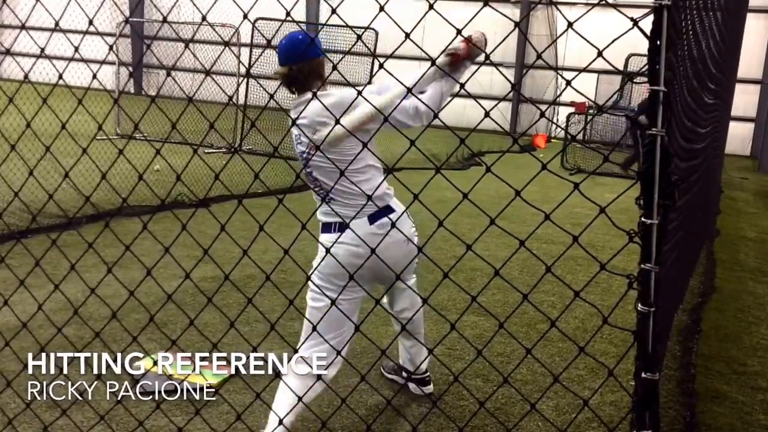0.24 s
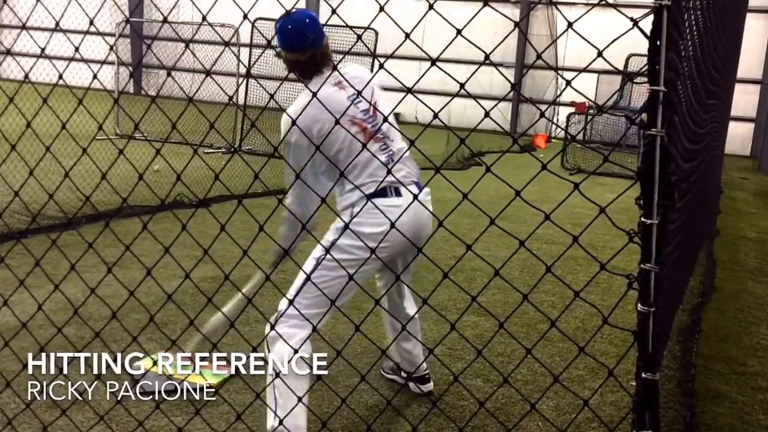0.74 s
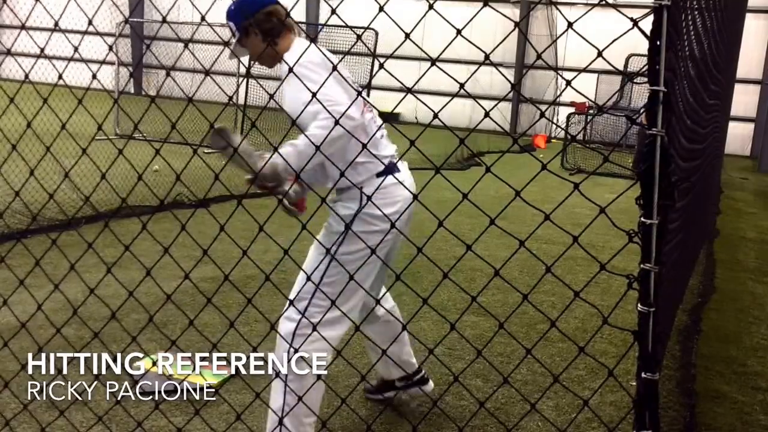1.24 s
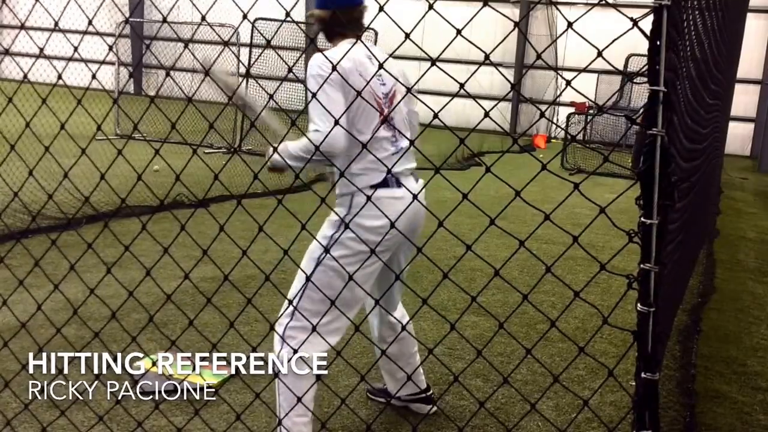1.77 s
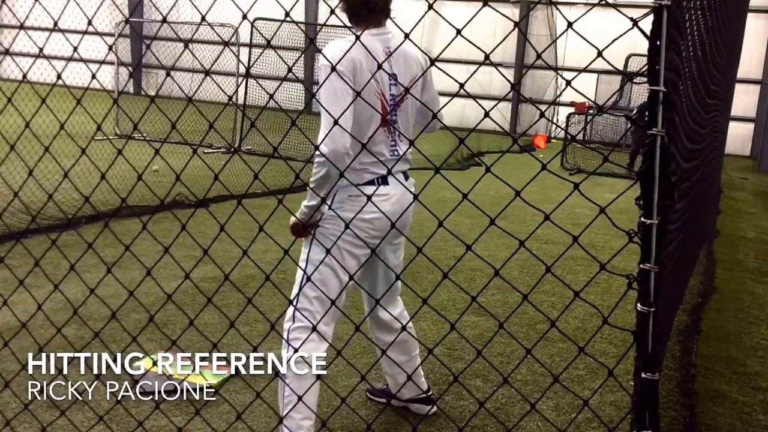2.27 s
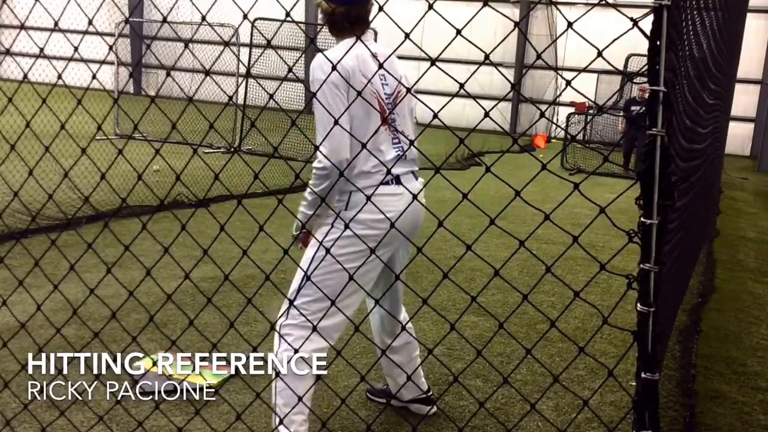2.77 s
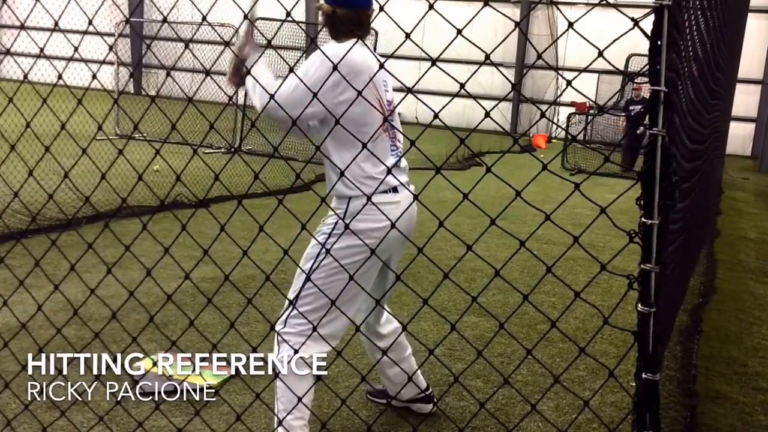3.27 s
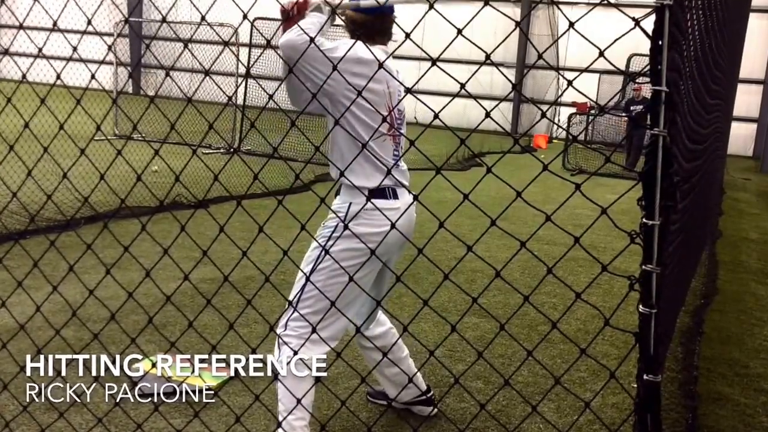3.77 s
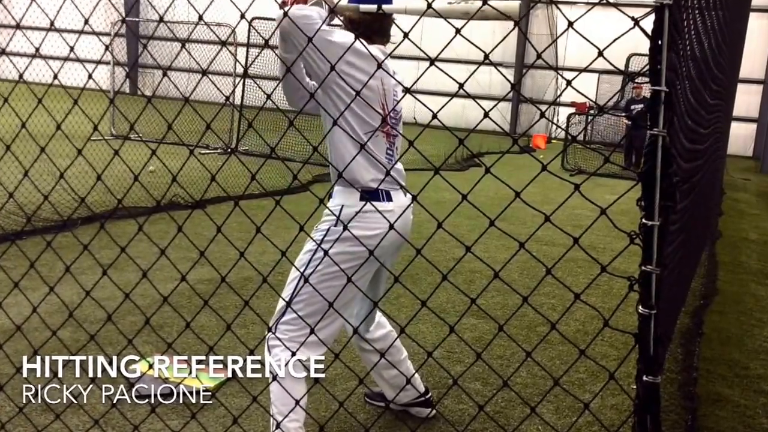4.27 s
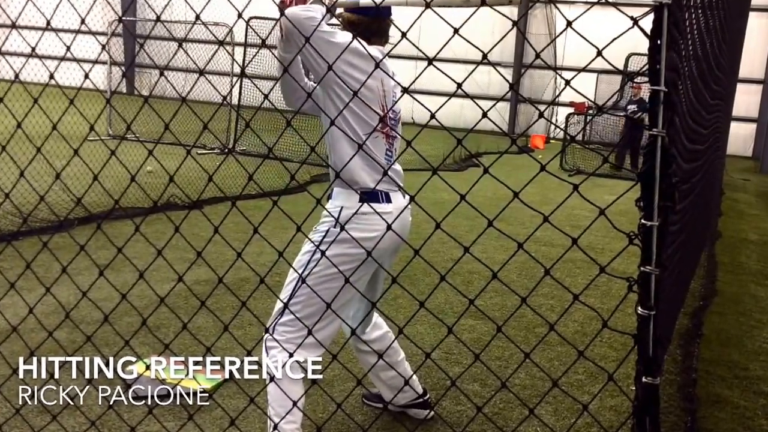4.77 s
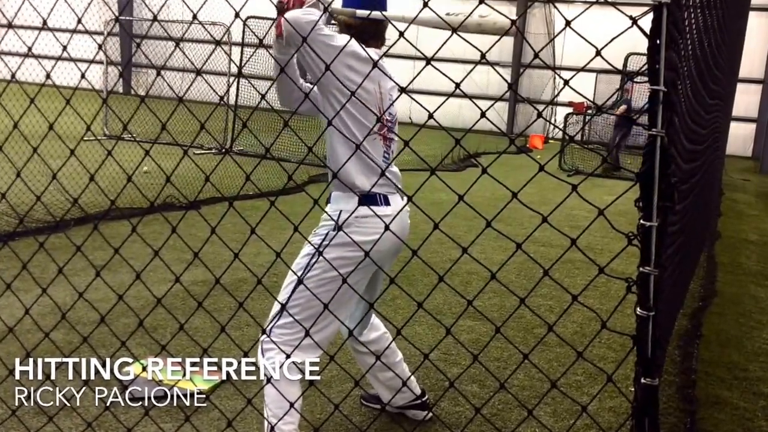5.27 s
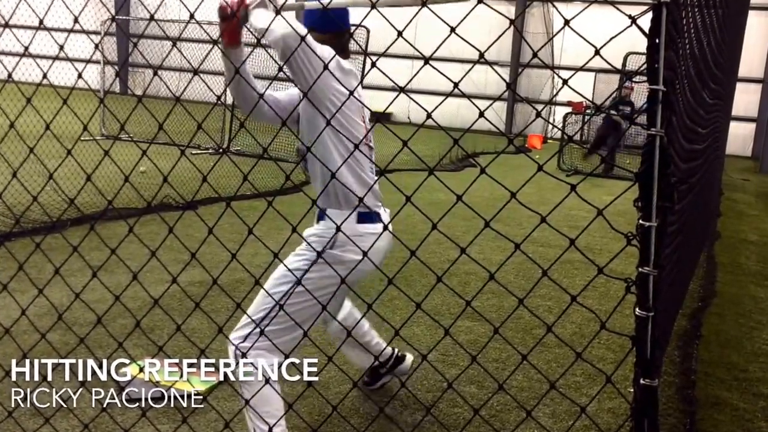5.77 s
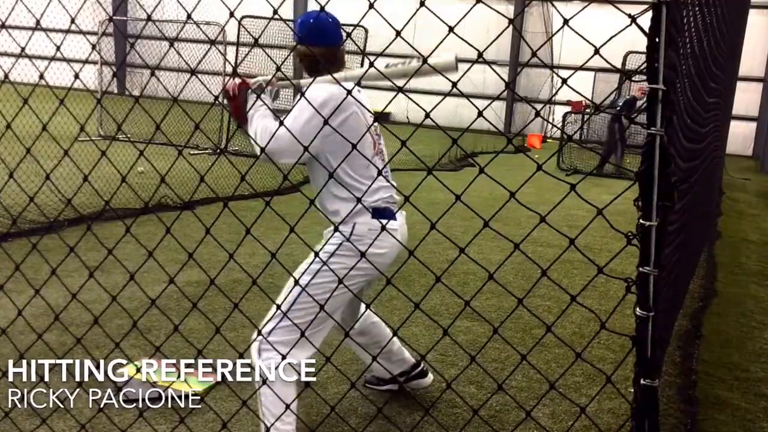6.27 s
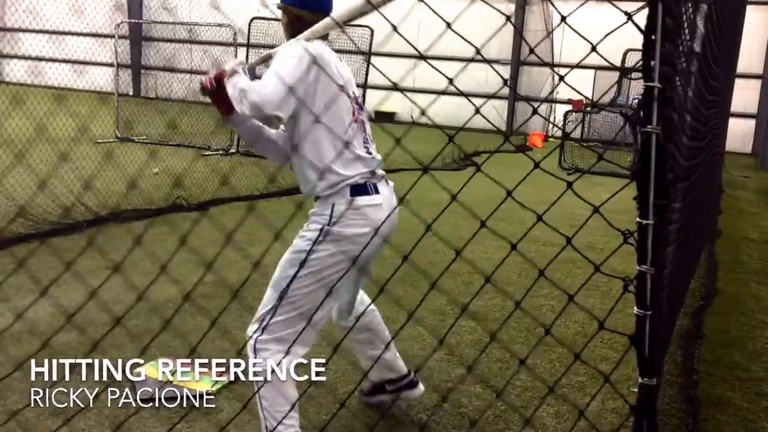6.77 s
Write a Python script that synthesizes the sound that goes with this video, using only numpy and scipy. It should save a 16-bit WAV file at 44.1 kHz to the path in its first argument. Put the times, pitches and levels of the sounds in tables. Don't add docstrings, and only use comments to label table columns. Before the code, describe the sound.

Inside a batting hall, a phone sits behind the net. At 0 s the clear, high ring of a metal bat just struck is already decaying, its crack spreading through the hall for about a second, with a faint far-wall echo near 0.25 s. Steady mains buzz with a bright, raspy treble, a thin wavering whine and low ventilation rumble continue throughout, gusting around 1.4 s and swelling near 3.5 s. Small dull taps on turf come at 0.3, 0.5 and 1.1 s, a clearer thud cluster at 1.8-1.9 s, then fainter ones at 2.0, 2.7-2.9, 3.2, 3.4, 5.0 and 5.9 s. From 6.1 s a soft airy hiss approaches; at 6.42 s a ball slams very loudly into the close padded screen, sharp snap, rattling cage, low padding boom, a weaker knock at 6.56 s. The background ducks briefly, then recovers. A small net click and light taps end it around 7 s.

```python
import sys
import numpy as np
from scipy import signal
from scipy.fft import rfft, irfft
from scipy.io import wavfile
from scipy.ndimage import uniform_filter1d

SR = 44100
rng = np.random.default_rng(int(sys.argv[2]) if len(sys.argv) > 2 else 0)


def transcribe(signal):
    frames = np.atleast_2d(signal).T
    limited = np.clip(frames, -1, 1)
    pcm = np.round(limited * 32767).astype(np.int16)
    wavfile.write(sys.argv[1], SR, pcm)


def undo_db(level):
    steps = np.asarray(level, float) / 20
    return 10 ** steps


N = 310023
LEAD = SR // 10
T = (np.arange(N + LEAD) - LEAD) / SR

BUZZ_HZ = 120.047
MULTIPLES = np.arange(3, 128)
# (band [Hz], t60 [s])
CAGE_DECAY = [(125, 0.48), (300, 0.33), (700, 0.37), (1500, 0.36), (3000, 0.38), (6000, 0.1), (10000, 0.3),
              (15000, 0.092)]


def colour(x, points):
    hz, db = np.transpose(points)
    size = 8192
    f = np.maximum(np.arange(size // 2 + 1) * SR / size, 1)
    log_gain = np.interp(np.log(f), np.log(hz), db) * np.log(10) / 20
    cepstrum = irfft(log_gain)
    cepstrum[1:size // 2] *= 2
    cepstrum[size // 2 + 1:] = 0
    response = irfft(np.exp(rfft(cepstrum)))
    return signal.fftconvolve(x, response)[:len(x)]


def noise_of_density(points):
    return colour(rng.standard_normal(len(T)), points) * np.sqrt(SR / 2)


def walk(rate):
    hold = int(SR / rate)
    levels = rng.standard_normal(len(T) // hold + 1)
    steps = np.repeat(levels, hold)[:len(T)]
    wander = uniform_filter1d(uniform_filter1d(steps, hold), hold)
    return wander / wander.std()


def fade(t, t60):
    return (t >= 0) * undo_db(-60 * np.maximum(t, 0) / t60)


def ring(start, modes):
    out = np.zeros(len(T))
    first = np.searchsorted(T, start)
    t = T[first:first + SR] - start
    for hz, db, t60 in modes:
        out[first:first + SR] += undo_db(db) * fade(t, t60) * np.sin(2 * np.pi * hz * t)
    return out


def snap(start, width):
    u = (T - start) / width
    return (1 - 2 * u ** 2) * np.exp(-u ** 2)


def tail(x, decays, gap, grain_db):
    t = np.arange(3 * SR // 2) / SR
    returns = rng.standard_normal(len(t)) * undo_db(grain_db * walk(400)[:len(t)])
    spectrum = rfft(returns)
    log_f = np.log(np.arange(len(t) // 2 + 1) * SR / len(t) + 1)
    centres = np.log(np.array(decays)[:, 0])
    answer = np.zeros(len(t))
    for own, (_, t60) in zip(np.eye(len(decays)), decays):
        band = irfft(spectrum * np.interp(log_f, centres, own), len(t))
        answer += band * fade(t - gap, t60)
    return signal.fftconvolve(x, answer)[:len(x)] / np.sqrt(np.sum(answer ** 2))


def ping():
    # (mode [Hz], level [dB])
    barrel_modes = [(1700, -38), (2040, -32), (2286, -53), (2380, -58), (2472, -36), (2538, -19.5),
                    (2700, -21.5), (2743, -18), (2915, -33), (2940, -26), (3510, -41)]
    # (frequency [Hz], level [dB])
    crack_colour = [(150, -38), (400, -17), (1000, -16), (1800, -18.5), (3000, -2), (4500, -15.5),
                    (8500, -24), (16000, -38)]
    ping_s, barrel_t60_s = -.03, .065
    barrel = ring(ping_s, [(hz, db, barrel_t60_s) for hz, db in barrel_modes])
    contact = 1. * (np.arange(len(T)) == np.searchsorted(T, ping_s))
    return barrel, colour(contact, crack_colour)


def slam():
    # (time [s], ring level [dB], snap level [dB])
    contacts = [
        (6.4164, 0, -9),
        (6.4177, -5.5, 1.5),
        (6.4182, -14, -9),
        (6.42, -13, -7),
        (6.428, -5, -30),
        (6.4585, -22, -44),
        (6.4693, -25, -44),
        (6.497, -17, -46),
        (6.5640, -19, -40),
    ]
    # (mode [Hz], level [dB], t60 [s])
    screen_modes = [(62, -22, .3), (273, -18.5, 0.16), (380, -21, 0.33), (480, -19, 0.078),
                    (582, -23, 0.029), (747, -14, 0.03), (824, -13.5, 0.066), (1233, -15, 0.064),
                    (1580, -17.5, 0.039), (2430, -8, 0.011), (2920, -14.5, 0.029), (3740, -21, 0.015)]
    # (time [s], level [dB])
    shakes = [
        (6.417, 1),
        (6.564, -21.5),
        (6.72, -35.5),
    ]
    # (frequency [Hz], level [dB])
    rattle_colour = [(60, 9), (200, 13), (800, -1), (2500, -3), (4000, -5.5), (8000, -9), (13000, -17.5),
                     (16500, -22)]
    # (centre [s], pitch [Hz], level [dB])
    swings = [(6.433, 198.5, -18), (6.451, 107, -11.5), (6.502, 110, -35), (6.574, 89, -20.5),
              (6.68, 212, -37), (6.714, 113, -29.5), (6.735, 158, -30), (6.756, 89, -34),
              (6.82, 126, -39.5), (6.854, 165.4, -31.5), (6.835, 238, -44.5), (6.89, 62, -45),
              (6.933, 109, -40.5), (6.96, 62, -46), (6.98, 144, -35.5)]
    boom_half_s = .019
    hit = np.zeros(len(T))
    for s, db, snap_db in contacts:
        hit += undo_db(db) * ring(s, screen_modes) + undo_db(snap_db) * snap(s, .00004)
    push = np.zeros(len(T))
    for s, db in shakes:
        push[np.searchsorted(T, s)] = undo_db(db)
    jolt = undo_db(21) * colour(push, rattle_colour)
    booms = np.zeros(len(T))
    for s, hz, db in swings:
        swell = np.exp(-((T - s) / boom_half_s) ** 2)
        booms += undo_db(db) * swell * np.cos(2 * np.pi * hz * (T - s))
    return hit + tail(jolt, CAGE_DECAY, gap=0.00074, grain_db=2.5) + booms, jolt


def taps():
    # (time [s], thud level [dB], thud pitch [Hz], tick level [dB])
    touches = [(0.264, -38.5, 300, -60), (0.491, -53, 405, -44), (1.095, -59, 805, -50),
               (1.8268, -24.5, 370, -51), (1.847, -33.5, 417, -37.5), (1.853, -36.5, 298, -45),
               (1.88, -39, 323, -57), (1.892, -42, 330, -47), (2.029, -51, 295, -54),
               (2.716, -51, 1530, -64), (2.823, -56, 705, -60), (2.863, -53, 330, -65),
               (3.171, -45, 380, -62), (3.391, -53, 303, -64), (4.969, -59, 404, -76),
               (5.872, -47.5, 380, -69), (6.409, -25, 150, -53), (6.9504, -33, 480, -40),
               (6.954, -41.5, 256, -48), (6.991, -37, 2250, -42), (7, -47, 604, -43.5),
               (7.013, -47, 696, -44), (7.022, -41, 450, -58), (7.027, -46, 907, -50)]
    thud_t60_s, tick_t60_s = 0.034, 0.0092
    clip_s, clip_db = 6.9496, -25
    thuds, starts = np.zeros(len(T)), np.zeros(len(T))
    for s, db, hz, tick_db in touches:
        thuds += ring(s, [(hz, db, thud_t60_s), (1.73 * hz, db - 16.5, thud_t60_s / 2)])
        starts[np.searchsorted(T, s)] = undo_db(tick_db + 1.5)
    tick_level = signal.lfilter([1], [1, -undo_db(-60 / (tick_t60_s * SR))], starts)
    ticks = rng.standard_normal(len(T)) * tick_level
    ticks = colour(ticks, [(300, 1), (900, 3.5), (1900, 11.5), (3000, 1), (4500, -25), (12000, -54)])
    clip = undo_db(clip_db) * np.exp(-np.abs(T - clip_s) / .0001)
    direct = colour(thuds, [(1200, -1.0), (3500, -21), (8000, -54)]) + ticks + clip
    return direct + undo_db(-17) * tail(direct + undo_db(11.5) * ticks, CAGE_DECAY, gap=0.0096, grain_db=2.0)


def flight():
    # (time [s], level [dB])
    approach = [
        (5.95, -122),
        (6.1, -59.5),
        (6.25, -56),
        (6.36, -67),
        (6.41, -40),
        (6.43, -86),
    ]
    rush = colour(rng.standard_normal(len(T)), [(300, -9), (900, 3.5), (1600, -1), (3500, -1), (9000, -14)])
    return rush * undo_db(np.interp(T, *np.transpose(approach)))


def buzz_db():
    # (centre [Hz], width [Hz], level [dB])
    lamp_resonances = [(325, 130, -70.9), (653, 171, -73.3), (932, 206, -73.6), (1332, 484, -76.4), (2356, 594, -77.4),
                       (2882, 316, -73.5), (3366, 471, -76.8), (3879, 90, -61.5), (4137, 108, -70.2),
                       (4431, 174, -68.0), (5192, 924, -78.7), (5743, 277, -70.2), (6072, 90, -63.2),
                       (6367, 190, -67.2),
                       (6671, 145, -55.5), (7167, 212, -58.9), (7813, 315, -63.1), (8100, 90, -52.0),
                 (8421, 90, -59.1), (8584, 227, -65.8), (9221, 237, -65.3), (10172, 395, -65.4),
                 (10662, 222, -71.5), (11365, 90, -69.3), (11700, 90, -67.2), (12102, 90, -73.2),
                 (12417, 280, -81.2), (14341, 1316, -86.4)]
    hz = BUZZ_HZ * MULTIPLES
    power = undo_db(-200)
    for centre, width, db in lamp_resonances:
        power = power + undo_db(2 * db) / (1 + (2 * (hz - centre) / width) ** 2) ** 2
    return 10 * np.log10(power)


def ballast_buzz(smear=1.875, half_db=-24, hiss_db=-31, dip_db=6):
    size, levels = 32768, buzz_db()
    lines = np.zeros(size // 2 + 1, complex)
    phases = np.cumsum(smear * rng.standard_normal(len(levels)))
    lines[2 * MULTIPLES] = undo_db(levels) * np.exp(1j * phases)
    nearby_db = 10 * np.log10(uniform_filter1d(undo_db(2 * levels), size=3))
    chance = rng.standard_normal((2, len(levels)))
    lines[2 * MULTIPLES + 1] = undo_db(nearby_db + half_db) * (chance[0] + 1j * chance[1])
    cycle = irfft(lines) * size / np.sqrt(2)
    buzz = np.interp(BUZZ_HZ / 2 * T % 1, np.arange(size) / size, cycle, period=1)
    on_lines = np.transpose([BUZZ_HZ * MULTIPLES, nearby_db + hiss_db])
    between = on_lines + [BUZZ_HZ / 2, -dip_db]
    return buzz + noise_of_density(np.stack([on_lines, between], axis=1).reshape(-1, 2))


def ballast_whine(wander_hz=1.37):
    # (distance from the carrier [buzz multiples], level [dB])
    sidebands = [(-11, -88), (-5, -85), (-4, -81.5), (-2, -77), (-1, -91), (0, -65), (1, -76), (3, -76),
                 (4, -83), (5, -83), (7, -81), (15, -78.5), (18, -77.5)]
    whine_hz, second_hz, second_db = 2023.4, 3805, -76
    phase = 2 * np.pi * np.cumsum(whine_hz + wander_hz * walk(7.3)) / SR
    whine = undo_db(second_db) * np.sin(phase * second_hz / whine_hz)
    for k, db in sidebands:
        whine += undo_db(db) * np.sin(phase + 2 * np.pi * (k * BUZZ_HZ * T + rng.random()))
    return np.sqrt(2) * whine * undo_db(1.0 * walk(15))


def air(split_hz=240, deep_hz=95):
    # (frequency [Hz], density [dB per Hz])
    air_colour = [(25, -78), (55, -79.5), (85, -77), (115, -78), (175, -74.5), (225, -89), (330, -98.5),
                  (480, -105), (1500, -107), (3800, -104), (5000, -108), (8000, -104), (10500, -112),
                 (15000, -120)]
    # (centre [s], half length [s], level [dB])
    gusts = [
        (.7, 0.19, 1.9),
        (1.4, 0.27, 6),
        (2.2, 0.34, 2),
        (3.5, 0.93, 7.5),
    ]
    rumble_db, wander_db = -5, 2.5
    noise = noise_of_density(air_colour)
    low = signal.sosfiltfilt(signal.butter(2, split_hz, fs=SR, output="sos"), noise)
    deep = signal.sosfiltfilt(signal.butter(2, deep_hz, fs=SR, output="sos"), noise)
    gust_db = sum(db * np.exp(-((T - s) / half) ** 2) for s, half, db in gusts)
    flutter_db = rumble_db + 1.2 * walk(14) + wander_db * walk(5.13)
    return noise - low + (low - deep) * undo_db(flutter_db + gust_db) + deep * undo_db(flutter_db + 1.0)


def scene():
    # (band [Hz], t60 [s])
    hall_decay = [(125, 0.096), (300, 0.42), (600, 0.58), (1000, 0.85), (2000, 0.98), (4000, 1.24),
                  (8000, 1.14), (14000, 0.73)]
    wall_delay_s, wall_db = 0.28, -37
    barrel, crack = ping()
    far = undo_db(8.5) * barrel + undo_db(24.5) * crack
    far = far + undo_db(wall_db) * np.roll(far, int(wall_delay_s * SR))
    near, jolt = slam()
    small = taps()
    into_hall = far + undo_db(-10.5) * jolt + undo_db(-14.0) * small
    wet = tail(into_hall, hall_decay, gap=0.0072, grain_db=1.5)
    blows = undo_db(28.5) * barrel + near + small + wet + flight()
    return (blows + ballast_buzz() + ballast_whine() + air())[None, LEAD:]


def duck_db():
    # (blow [s], gain at first [dB], gain before letting go [dB])
    ducks = [
        (-.03, 0.5, -6),
        (6.415, -7.5, -4.5),
    ]
    attack_s, hold_s, release_s = 0.013, 0.25, 0.061
    steps = np.cumsum([0, attack_s, hold_s, release_s])
    return sum(np.interp(T, s + steps, [0, first_db, last_db, 0]) for s, first_db, last_db in ducks)


def drop_quiet_treble(x):
    # (low edge [Hz], high edge [Hz], share of the time [0-1])
    gaps = [(10930, 11200, .55), (11940, 12060, .5), (12200, 12290, .7), (12700, 12920, 1),
            (12920, 13020, .75), (13020, 13600, 1), (14390, 14530, .7), (14800, 14920, .4),
            (15320, 16000, 1)]
    frame = 2048
    f = np.arange(N // 2 + 1) * SR / N
    whole = rfft(x)
    for lo, hi, share in gaps:
        band = irfft(whole * ((f > lo) & (f < hi)), N)
        quiet = uniform_filter1d(band ** 2, size=1024) < undo_db(-2 * 70)
        chosen = np.repeat(rng.random(N // frame + 1) < share, frame)[:N]
        x = x - band * uniform_filter1d(1. * (quiet & chosen), size=512)
    return x


def roll_off(x):
    return signal.sosfilt(signal.butter(12, 15820, fs=SR, output="sos"), x)


def record(dry):
    x = signal.sosfilt(signal.butter(3, 42, "high", fs=SR, output="sos"), dry)
    x = np.tanh(0.9 * x * undo_db(duck_db()[LEAD:])) / 0.86
    return roll_off(drop_quiet_treble(x))


dry = scene()
out = record(dry)
transcribe(out)
```